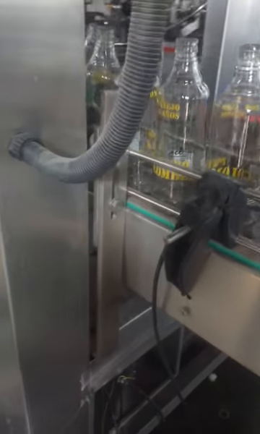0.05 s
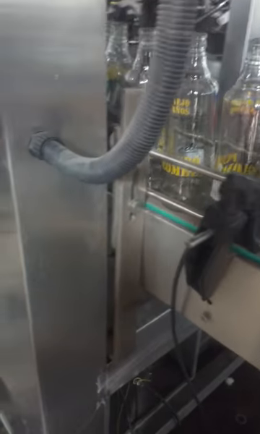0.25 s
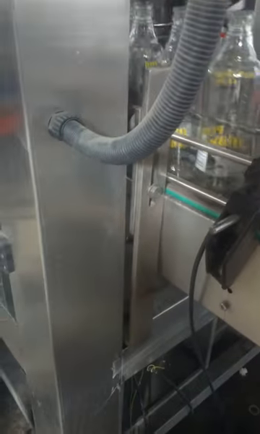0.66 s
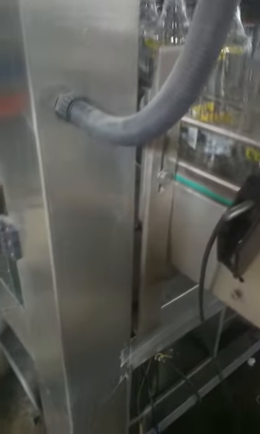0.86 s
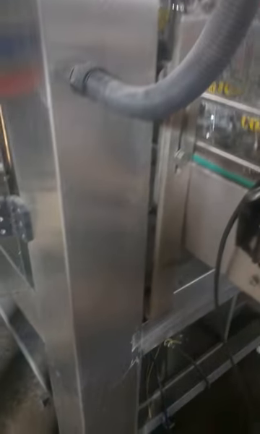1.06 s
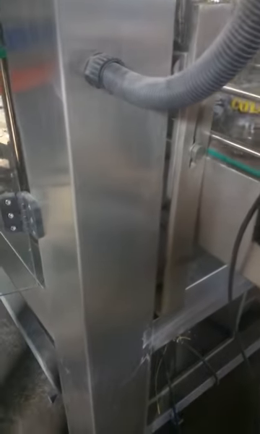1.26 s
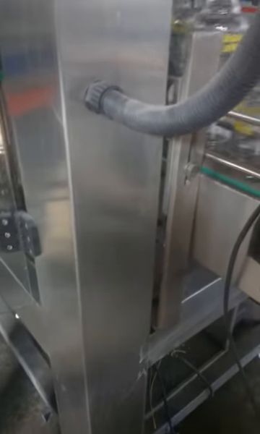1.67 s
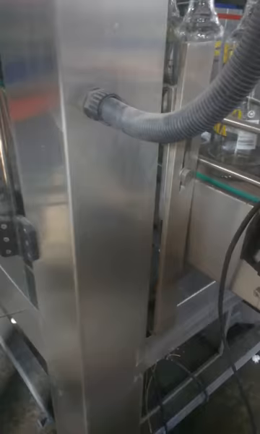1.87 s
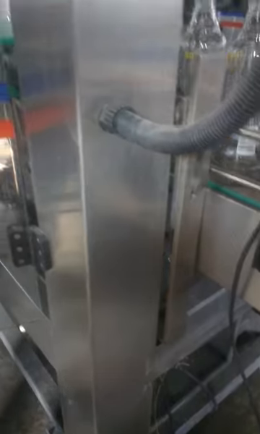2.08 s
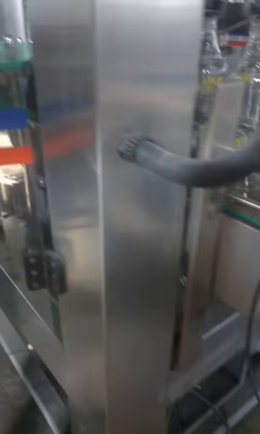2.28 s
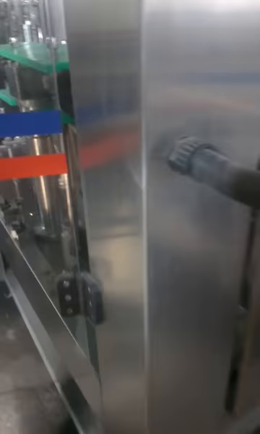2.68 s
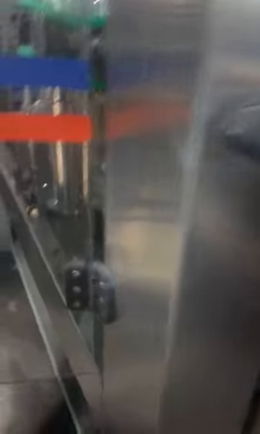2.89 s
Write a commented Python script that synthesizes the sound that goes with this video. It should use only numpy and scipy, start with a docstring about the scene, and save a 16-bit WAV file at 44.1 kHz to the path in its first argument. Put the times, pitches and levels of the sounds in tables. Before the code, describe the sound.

Glass bottles knock together on a rattling conveyor while air hisses over steady machine noise.

```python
"""Glass bottles clink and jostle along a conveyor in a bottling hall. Each knock rings a few bottles
of slightly different pitch and rattles the steel guides; hard taps add a bright ping. A valve lets
off air near the start, and later a thinner hiss comes and goes over the steady din of the line."""
import sys
import numpy as np
from scipy import signal
from scipy.fft import rfft, irfft
from scipy.io import wavfile

SR = 44100
rng = np.random.default_rng(int(sys.argv[2]) if len(sys.argv) > 2 else 0)


def log_audio(samples):
    """Write samples as a 16-bit WAV file to the path given in sys.argv[1]."""
    # one column per channel
    frames = np.atleast_2d(samples).T
    # limit to full scale, then quantise
    limited = np.clip(frames, -1, 1)
    pcm = np.round(limited * 32767).astype(np.int16)
    wavfile.write(sys.argv[1], SR, pcm)


N = 134505
T = np.arange(N) / SR


def from_db(db):
    """Turn decibels into a number to multiply a sound by."""
    return 10 ** (np.asarray(db) / 20)


def unit_level(x):
    """Scale a sound so that its average level (rms) is 1."""
    return x / np.sqrt(np.mean(x ** 2) + 1e-20)


def shape_tone(x, spectrum):
    """Make some pitches stronger than others, then set the overall level to 1."""
    pitch_hz, level_db = np.transpose(spectrum)
    bins_hz = np.maximum(np.fft.rfftfreq(N, 1 / SR), 1)
    gain = from_db(np.interp(np.log(bins_hz), np.log(pitch_hz), level_db))
    return unit_level(irfft(rfft(x) * gain, N))


def resonance(x, pitch_hz, width_hz):
    """Keep the sound near one pitch; a narrower band rings longer."""
    r = np.exp(-np.pi * width_hz / SR)
    feedback = [1, -2 * r * np.cos(2 * np.pi * pitch_hz / SR), r * r]
    return signal.lfilter(np.array([1, 0, -1]) * (1 - r * r) / 2, feedback, x)


def strike(rise_s, fade_s, hold_s=0):
    """Loudness of one blow: it rises quickly, holds, then falls 60 dB in fade_s."""
    t = T[:SR // 2]
    return (1 - np.exp(-t / rise_s)) * from_db(-60 * np.maximum(t - hold_s, 0) / fade_s)


def add(out, start_s, sound):
    """Mix a sound in at the given time."""
    i = min(max(int(start_s * SR), 0), N)
    out[i:i + len(sound)] += sound[:N - i]


# Tone of the din, low to high. Columns: pitch_hz, relative_db
DIN_SPECTRUM = [(300, 1.5), (2500, -12.5), (4200, -8), (9700, -15), (12000, -29.5)]

def din(level_db=-50.5):
    """The running line fills the hall with a steady noise."""
    return from_db(level_db) * shape_tone(rng.standard_normal(N), DIN_SPECTRUM)


# Loudness of the hiss over time. Columns: time_s, level_db
HISS_LEVELS = [(1.38, -51), (1.5, -38), (2.04, -39), (2.11, -51), (2.24, -31.5), (2.45, -42), (2.65, -36.5),
               (2.85, -47), (2.98, -41.5)]
# Tone of the hiss. Columns: pitch_hz, relative_db
HISS_SPECTRUM = [(1000, -17), (3300, -0.5), (6000, -14.5), (11000, -45)]

def thin_hiss():
    """A thin hiss swells and fades several times."""
    loudness = from_db(np.interp(T, *np.transpose(HISS_LEVELS)))
    return loudness * shape_tone(rng.standard_normal(N), HISS_SPECTRUM)


def hall_echo(sound, level_db=-11):
    """The hall's many reflections blur into one short tail."""
    tail = strike(rise_s=.004, fade_s=.3)
    tail = tail * rng.standard_normal(len(tail))
    return from_db(level_db) * signal.fftconvolve(sound, tail / np.linalg.norm(tail))[:N]


# Tone of the jet of air. Columns: pitch_hz, relative_db
JET_SPECTRUM = [(300, -13), (2400, -2), (3100, 3.5), (4600, 1), (5200, -10), (9800, -29.5), (12000, -49)]

def air_release(start_s=.213, rise_s=.017, fade_s=.35):
    """A valve opens; as the pressure falls, the jet weakens and its hissing peak sinks in pitch."""
    first_hz, sink_hz_per_s, width_hz = 4030, 2900, 680
    age_s = np.maximum(T - start_s, 0)
    flow = np.minimum(age_s / rise_s, 1) ** 2 * np.exp(-(age_s / fade_s) ** 2)
    peak_hz = first_hz - sink_hz_per_s * np.minimum(age_s, fade_s)
    smoothing = signal.butter(2, width_hz / 2, fs=SR, output="sos")
    swirl = unit_level(signal.sosfilt(smoothing, rng.standard_normal(N)))
    # Slow noise times a tone gives a band of hiss around that tone.
    peak = unit_level(swirl * np.sin(2 * np.pi * np.cumsum(peak_hz) / SR))
    jet = shape_tone(rng.standard_normal(N), JET_SPECTRUM)
    return flow * (from_db(-26.5) * jet + from_db(-30.5) * flow * peak)


CONTACT_S = .0003  # rise time of a hard contact
# Notes of the steel guides. Columns: pitch_hz, width_hz, boost_db
GUIDE_NOTES = [(475.7, 11, 0), (1474, 6.6, 5), (1647, 20, 6.5)]
# Tone of their rattle. Columns: pitch_hz, relative_db
RATTLE_SPECTRUM = [(300, 4), (650, 2.5), (1200, 5.5), (1900, 1.5), (3000, 6.5), (5400, -12), (9700, -25.5),
                   (12000, -59)]

def guide_rattle(knocks, contacts_per_s=2500):
    """Each knock shakes the steel guides: a crack, a dying shower of tiny contacts and a hollow note."""
    force, hollow = np.zeros(N), np.zeros(N)
    blow = strike(rise_s=.0018, fade_s=.16, hold_s=.025)
    crack = strike(CONTACT_S, fade_s=.01)
    for start_s, rattle_db, _, upper_db in knocks:
        shake = from_db(rattle_db - 11.5) * blow
        add(force, start_s, shake)
        add(force, start_s, from_db(upper_db - 5) * crack)
        hollow_hz = 1192 * 2 ** rng.uniform(-.43, .43)  # every spot on the guides has its own note
        note = resonance(rng.standard_normal(len(blow)), hollow_hz, width_hz=120)
        add(hollow, start_s, shake * unit_level(note))
    sizes = from_db(3 * np.minimum(rng.exponential(1, N), 4))  # mostly small, a few up to 12 dB louder
    contacts = sizes * rng.choice([-1, 1], N) * (rng.random(N) < contacts_per_s / SR)
    ringing = sum(from_db(db) * resonance(contacts, hz, width) for hz, width, db in GUIDE_NOTES)
    return force * shape_tone(contacts + ringing, RATTLE_SPECTRUM) + from_db(-6.5) * hollow


def bottle_pair(notes, pitch_spread, rise_s, fade_s, spread_db=3.5):
    """Two bottles ring with the same notes, each a little different in pitch and strength."""
    t = T[:SR // 4]
    pitch_hz, level_db = np.transpose(notes + notes)[:, :, None]
    pitch_hz = pitch_hz * (1 + pitch_spread * np.clip(rng.standard_normal(pitch_hz.shape), -2, 2))
    gain = from_db(level_db + spread_db * rng.standard_normal(pitch_hz.shape))
    ring = (gain * np.sin(2 * np.pi * pitch_hz * t)).sum(0)
    return ring * strike(rise_s, fade_s)[:len(t)]


# Hard taps of glass on glass. Columns: start_s, ping_db, ping_hz, click_relative_db, click_hz
HARD_TAPS = [(0.517, -59, 5400, -40, 1160), (0.528, -39.5, 5650, -47, 1210),
             (0.572, -38.5, 5620, -45, 2940), (0.9109, -33.5, 5600, -38.5, 2560),
             (0.9745, -45, 5700, -39, 2680), (1.0972, -36.5, 5600, -45, 2660),
             (1.545, -39.5, 5640, -45, 2700), (1.578, -35, 5580, -26, 3970), (1.633, -35, 4900, -33, 4030),
             (1.7196, -52, 6660, -41, 2750), (2.2545, -39.5, 6240, -35.5, 3780)]

def hard_taps(click_width_hz=800, click_boost_db=12):
    """A hard tap makes a short hollow click and a high ping from both bottles."""
    out = np.zeros(N)
    force = strike(CONTACT_S, fade_s=.082)
    for start_s, ping_db, ping_hz, click_db, click_hz in HARD_TAPS:
        click = rng.standard_normal(len(force))
        for _ in range(2):
            click = resonance(click, click_hz, click_width_hz)
        add(out, start_s, from_db(click_db + click_boost_db) * force * unit_level(click))
        notes = [(ping_hz, ping_db), (ping_hz * 1.315, ping_db - 13.5)]  # the ping and a softer overtone
        add(out, start_s, bottle_pair(notes, pitch_spread=.009, rise_s=CONTACT_S, fade_s=.18))
    return out


# A bottle's lowest note and its upper notes. Columns: pitch_hz, relative_db
LOW_NOTE = (2235, -5.5)
UPPER_NOTES = [(4180, -3), (4300, -5.5), (5000, -13.5), (5490, -18), (5870, -20), (6370, -18), (7560, -25),
               (9500, -36)]
# Knocks between bottles (the faint one at 0.189 s is a small click from the valve), and how strongly each stirs
# the guides, the low note and the upper notes. Columns: start_s, rattle_db, low_db, upper_db (all relative
# levels)
KNOCKS = [(0.001, -32.5, -36.5, -33), (0.047, -35, -34, -44), (0.088, -31, -34, -40.5),
          (0.189, -40, -54, -45), (0.494, -45, -24, -35), (0.518, -23, -36, -26), (0.536, -62, -16, -29),
          (0.575, -30, -18, -31), (0.639, -31, -28, -50), (0.699, -27.5, -22.5, -43),
          (0.777, -29, -35.5, -39.5), (0.839, -26, -29, -26), (0.873, -30, -29, -37),
          (0.933, -27.5, -21.5, -29), (0.974, -31, -23, -45), (1.038, -27, -38, -32),
          (1.071, -29, -46, -56), (1.095, -38, -15.5, -46), (1.12, -25, -18, -30), (1.148, -35, -20, -30.5),
          (1.208, -33, -26.5, -38), (1.283, -31.5, -39, -37.5), (1.301, -28, -20, -27.5),
          (1.356, -34.5, -46, -32), (1.408, -25, -22, -33.5), (1.435, -35, -20.5, -30),
          (1.466, -30, -24.5, -26.5), (1.497, -26, -17.5, -25), (1.549, -27, -12.5, -28.5),
          (1.574, -23, -16, -24), (1.595, -25.5, -17, -33), (1.627, -25, -17.5, -24),
          (1.669, -32, -19.5, -22.5), (1.719, -24, -17.5, -20), (1.773, -30, -27, -28.5),
          (1.821, -29, -32, -35), (1.876, -27.5, -26, -29), (1.949, -32, -31.5, -31),
          (2.024, -29, -32, -30), (2.053, -36.5, -27.5, -29.5), (2.129, -32.5, -33.5, -26),
          (2.197, -26.5, -14, -25.5), (2.252, -25.5, -13, -23), (2.287, -36, -37, -26),
          (2.349, -25, -16, -24.5), (2.468, -30.5, -21.5, -36), (2.539, -29, -34, -28.5),
          (2.599, -40, -42, -29.5), (2.674, -29, -41, -28.5), (2.696, -29.5, -33, -31.5),
          (2.742, -29, -26, -28.5), (2.781, -38.5, -31, -30), (2.852, -41, -33, -32),
          (2.941, -37.5, -57, -31.5), (3.033, -36, -42, -30.5)]

def bottle_clinks(pairs=3, average_gap_s=.013, loss_db=5.5):
    """Each knock rings a pair of bottles, then passes on more weakly to their neighbours."""
    out = np.zeros(N)
    for start_s, _, low_db, upper_db in KNOCKS:
        for pair in range(pairs):
            for notes, level_db in (([LOW_NOTE], low_db), (UPPER_NOTES, upper_db)):
                ring = bottle_pair(notes, pitch_spread=.013, rise_s=.005, fade_s=.12)
                add(out, start_s, from_db(level_db - loss_db * pair) * ring)
            start_s += average_gap_s * rng.uniform(.5, 1.5)
    return out


def scene():
    """Bottles and guides echo in the hall; the air, hiss and din join them in one channel."""
    conveyor = bottle_clinks() + hard_taps() + guide_rattle(KNOCKS)
    return (conveyor + hall_echo(conveyor) + air_release() + thin_hiss() + din())[None]


def record(dry, low_cut_hz=310, high_cut_hz=11967):
    """The recorder cuts away the highest treble and all but a trace of the bass."""
    bass_cut = signal.butter(10, low_cut_hz, "high", fs=SR, output="sos")
    treble_cut = signal.cheby2(12, 50, high_cut_hz, fs=SR, output="sos")
    thin = signal.sosfilt(bass_cut, dry) + from_db(-35) * dry
    return signal.sosfilt(treble_cut, thin)


dry = scene()
out = record(dry)
log_audio(out)
```